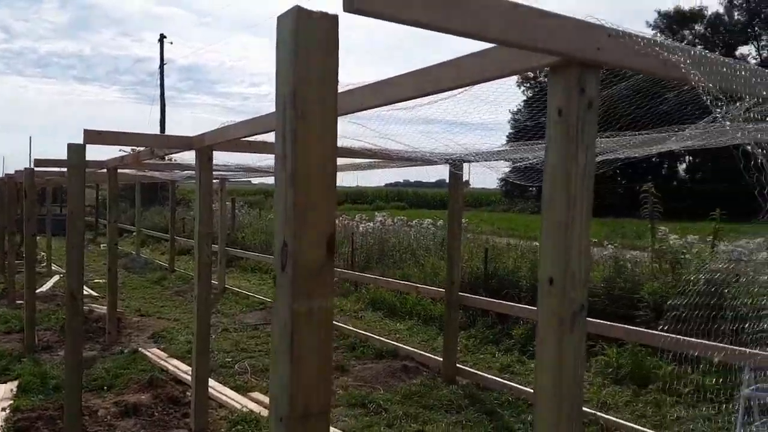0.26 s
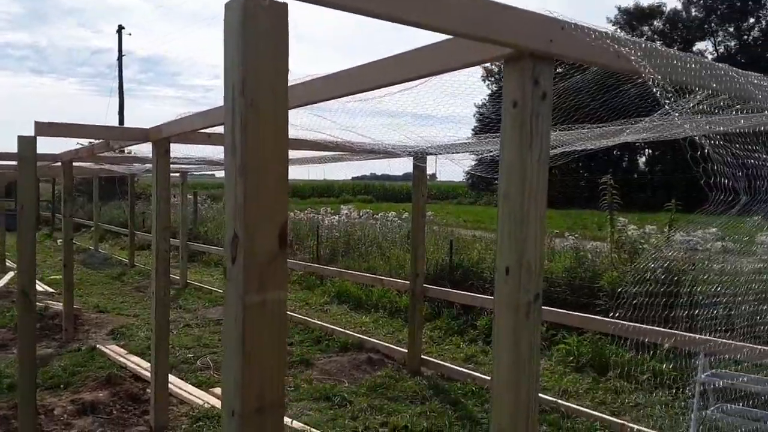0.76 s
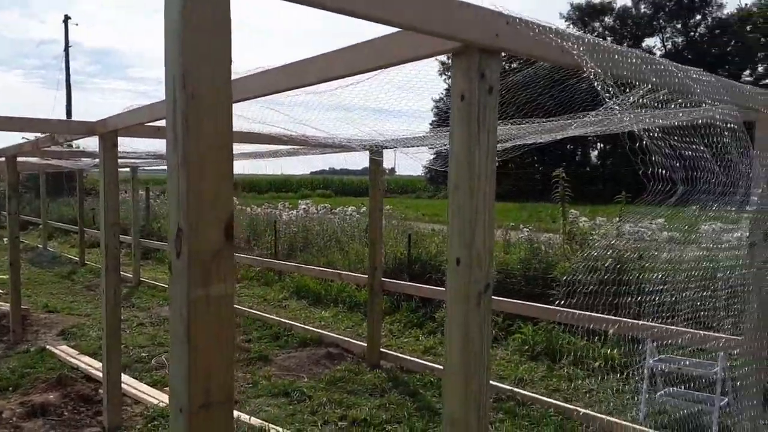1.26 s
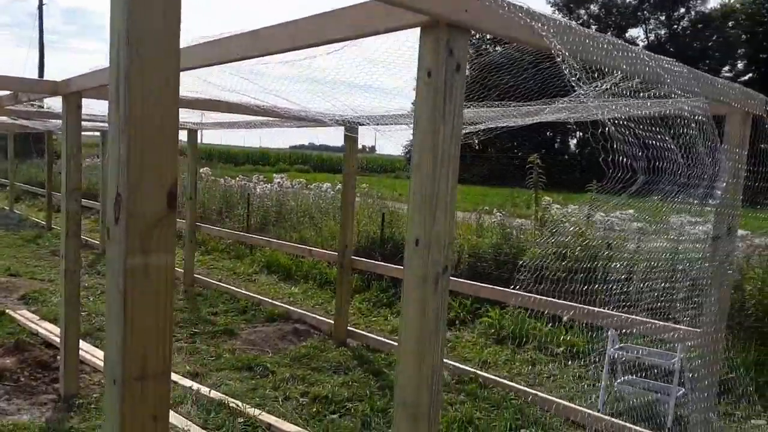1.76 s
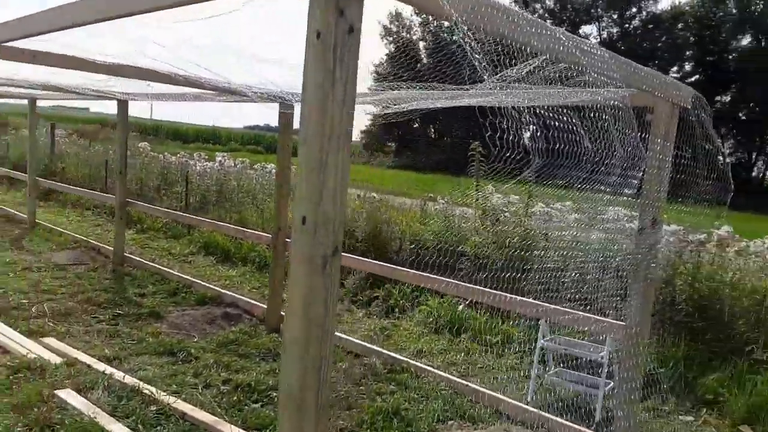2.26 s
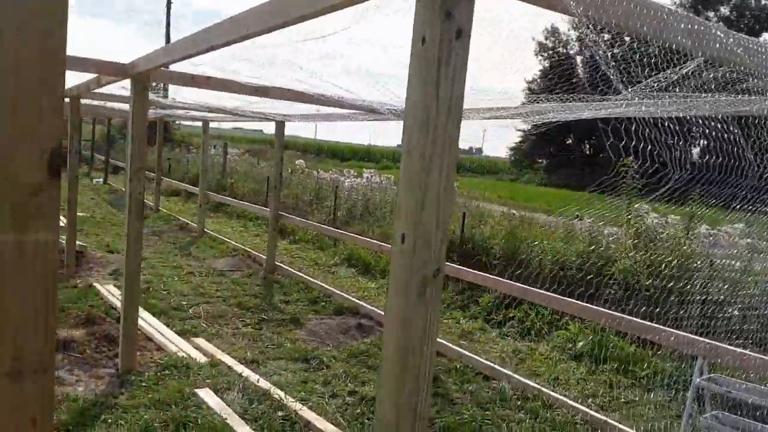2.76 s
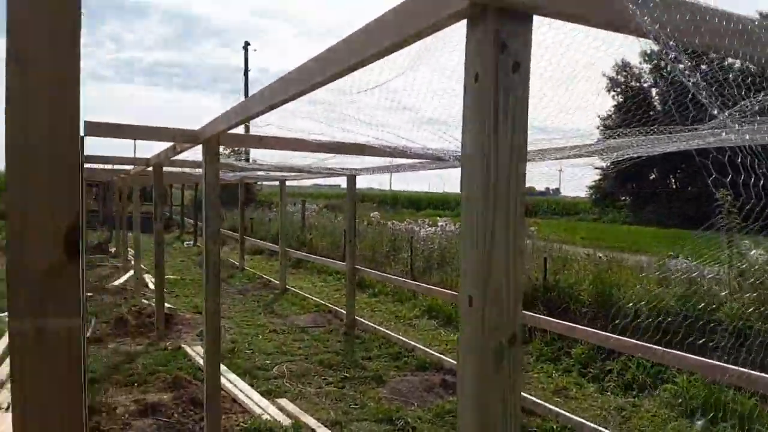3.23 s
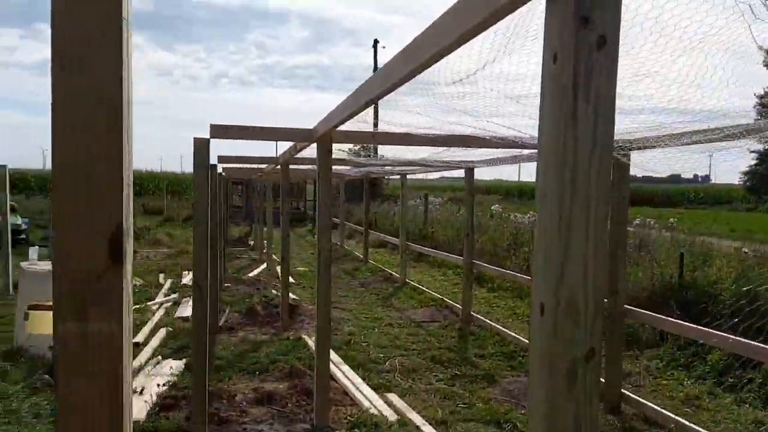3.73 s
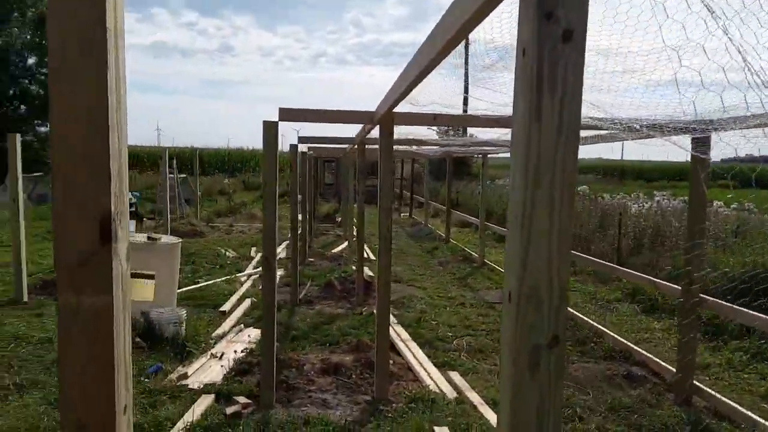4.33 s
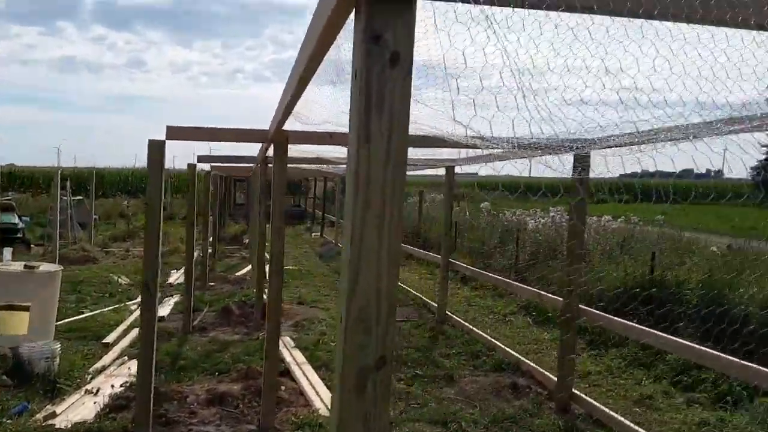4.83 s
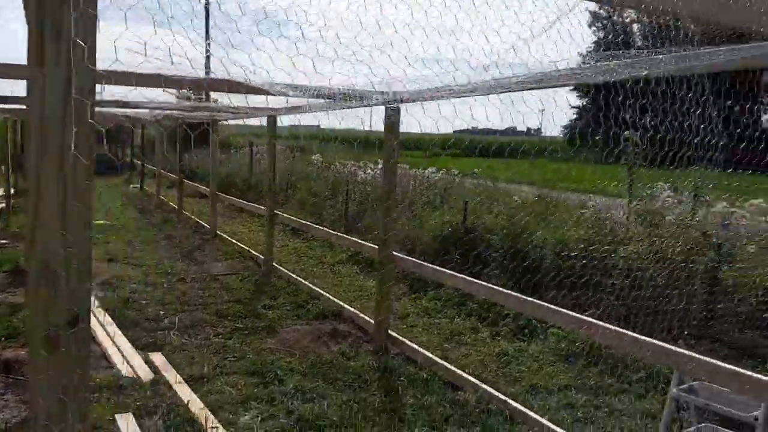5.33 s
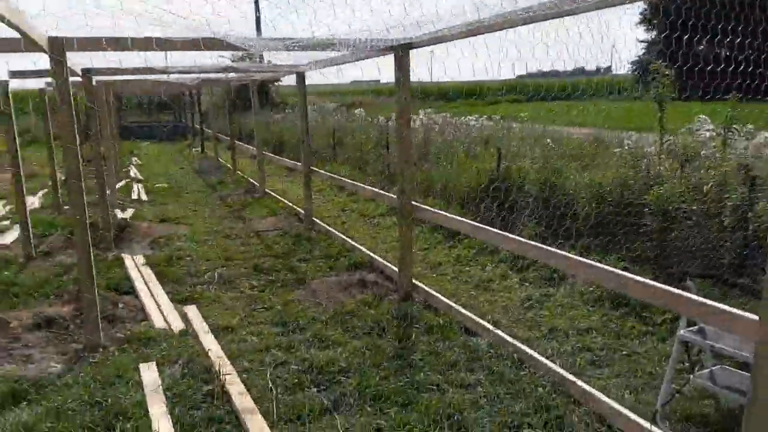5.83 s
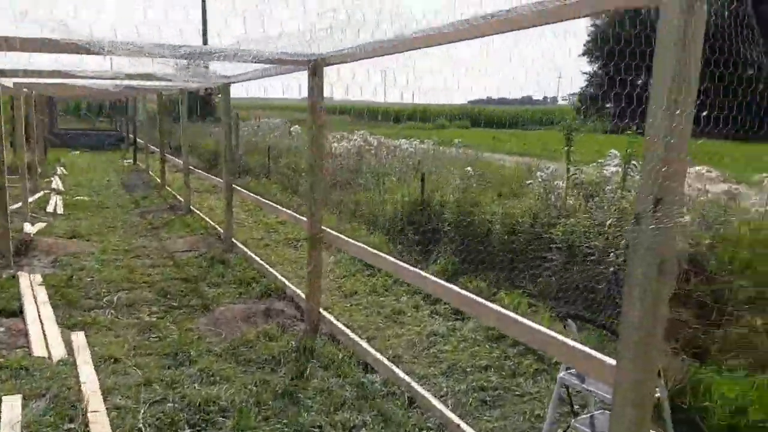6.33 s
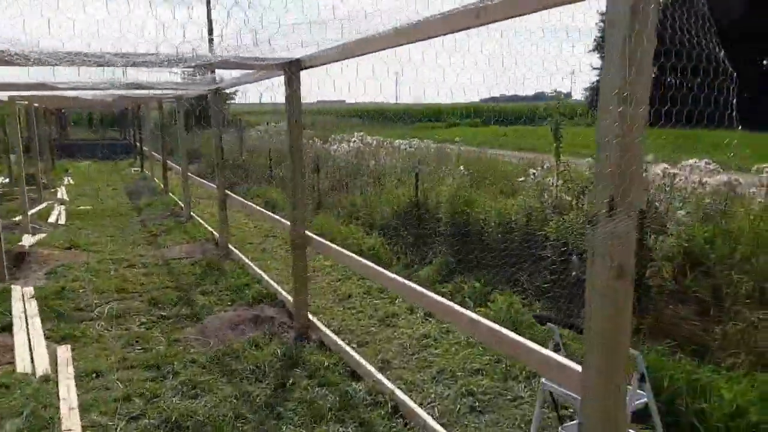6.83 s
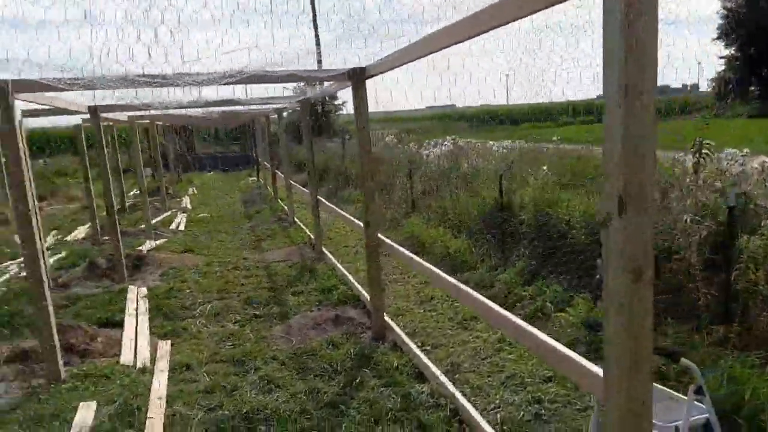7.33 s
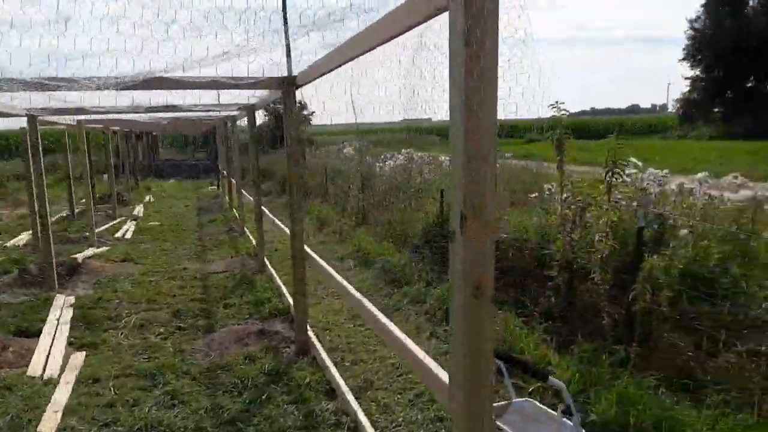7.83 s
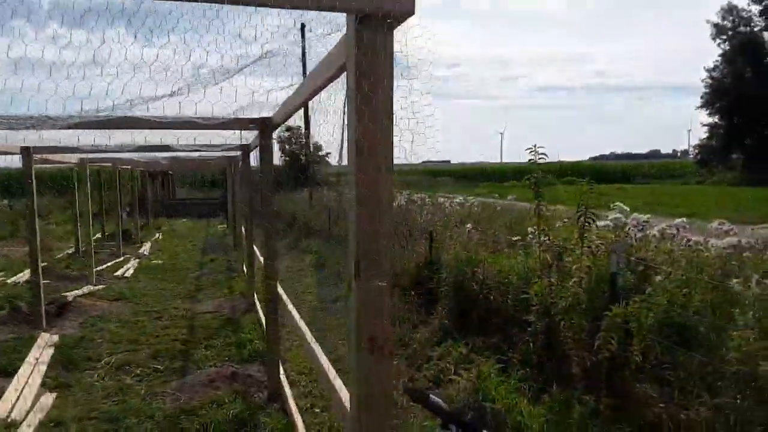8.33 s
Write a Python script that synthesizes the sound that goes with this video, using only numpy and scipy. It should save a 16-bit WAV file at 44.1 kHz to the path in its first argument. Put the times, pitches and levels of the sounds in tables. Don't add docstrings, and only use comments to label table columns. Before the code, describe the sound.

A quiet, open farm field heard in stereo from a carried microphone. From the start, high crickets pulse about sixteen times a second on the left, swelling and fading over a distant hissing insect drone, faint air and low wind rumble. A sparrow on the right gives quick, mostly falling chips from 0.7 to 1.8 seconds, then scattered ones until 4.6. Grass swishes softly around 2 to 3 seconds, with a few dry snaps near 2.6 and 2.9. At about 4.7 a rooster off to the left crows once: two short hoarse notes, a rasping climb and loud, rough peak to 5.5, then a clearer held note that roughens and fades by 6.8, lightly echoed. Cloth brushes blades during it. Dull grip knocks come around 6.3 to 7.0, with chirps near 6.6. A lower cricket enters around 7.3. From 7.75 to the end, close footsteps crackle and sharply snap dry stalks.

```python
import sys
import numpy as np
from scipy import signal
from scipy.fft import rfft, irfft, next_fast_len
from scipy.io import wavfile
from scipy.ndimage import uniform_filter1d

SR = 44100
rng = np.random.default_rng(int(sys.argv[2]) if len(sys.argv) > 2 else 0)


def linear_from_db(decibels):
    return 10 ** (np.asarray(decibels, float) / 20)


def unload_audio(sound):
    columns = np.transpose(np.atleast_2d(sound))
    steps = np.round(np.clip(columns, -1, 1) * 32767)
    wavfile.write(sys.argv[1], SR, steps.astype(np.int16))


N = 378816
T = np.arange(N) / SR

# [(t/s, f/Hz, effort/dB)]
LOW_FIRST = (17, [(4.666, 651, -73.5), (4.685, 658.5, -64.5), (4.7, 614, -66), (4.73, 627, -62.5),
             (4.755, 633, -71), (4.775, 640, -65), (4.8, 604, -65), (4.815, 600, -65)])
LOW_SECOND = (10, [(4.923, 634, -56), (4.935, 638, -65), (4.95, 640, -76.5), (4.985, 621, -69),
              (4.995, 635.6, -69), (5.012, 665.5, -64), (5.03, 642.5, -64), (5.045, 626.4, -72.5)])
LOW_CLIMB = (31.5, [(5.085, 589.6, -62), (5.11, 597, -62.5), (5.15, 621, -70.5), (5.17, 640.4, -65.5),
             (5.18, 625.4, -58), (5.198, 630.5, -69.5), (5.211, 641, -64.5), (5.225, 653, -76.5)])
LOW_PEAK = (34, [(5.226, 636, -69), (5.255, 635.3, -65.5), (5.288, 631, -64.5), (5.315, 630, -67.5),
            (5.332, 640, -71.5), (5.38, 655.4, -73.5), (5.43, 634, -72), (5.46, 617, -81),
            (5.52, 632.4, -75)])
LOW_FALL = (14.5, [(5.53, 686.5, -56), (5.57, 700, -51), (5.62, 704.7, -53.5), (5.7, 696.4, -50),
            (5.74, 677, -53.5), (5.78, 632, -61.5), (5.84, 589.6, -57), (5.89, 561, -62)])
LOW_TAIL = (-8, [(6.3, 706, -59), (6.5, 673, -53), (6.52, 717, -51.5), (6.58, 708, -53), (6.63, 663, -73),
            (6.665, 692, -49), (6.7, 695, -59), (6.77, 700, -66.5), (7.05, 718, -84)])
# [(t/s, f/Hz, effort/dB)]
HIGH_FIRST = (19.3, [(4.665, 629, -73), (4.69, 730, -65.5), (4.715, 795, -70), (4.737, 869, -66),
              (4.755, 750, -61), (4.79, 648, -71)])
HIGH_SECOND = (16.3, [(4.923, 829, -66.5), (4.941, 885, -72), (4.947, 911, -51.5), (4.965, 912, -59),
               (4.98, 881, -52.5), (5, 866, -62), (5.03, 899, -73), (5.06, 883, -68), (5.09, 880, -56)])
HIGH_RISE = (18.8, [(5.56, 853, -60), (5.585, 867, -58), (5.62, 878, -56), (5.66, 880, -57.5),
             (5.7, 919, -60.5), (5.74, 939.5, -67), (5.8, 966.6, -64), (5.9, 953, -62)])
HIGH_HELD = (13.1, [(5.901, 961, -52.5), (5.925, 883, -53), (5.96, 884, -52), (6.02, 877, -56.5),
             (6.1, 860, -55), (6.2, 859, -62)])
HIGH_TAIL = (19.1, [(6.201, 847, -68), (6.3, 862, -74), (6.4, 861, -70), (6.47, 840, -72.5),
             (6.51, 863, -75), (6.57, 862, -87), (6.6, 858, -73), (6.63, 873, -82), (6.68, 830, -92)])
# from t/s, to t/s, roughness 0-1
LOW_CLEAR = [(4.66, 4.82, .42), (4.91, 4.95, .25), (4.98, 5.04, .35), (5.09, 5.16, .4), (5.16, 5.22, .22),
             (5.24, 5.33, .05), (5.535, 5.77, .04), (5.77, 5.9, .15), (6.42, 6.6, .15), (6.6, 6.7, .2),
             (6.7, 6.77, .4)]
HIGH_CLEAR = [(4.66, 4.8, .4), (4.92, 5.0, .07), (5.03, 5.1, .3), (5.575, 5.715, .02), (5.715, 5.915, .35),
              (5.915, 6.16, .025), (6.58, 6.63, .1)]
# harmonic number, level re third harmonic/dB
LOW_REST = [(2, -21), (4, -16), (5, -34), (6, -28), (7, -29), (8, -36)]
# harmonic number, level re second harmonic/dB
HIGH_REST = [(3, -21), (4, -27), (5, -36)]
# t/s, gain/dB
LOW_BEAK = [(4.7, 15.5), (4.93, 6), (5, 16), (5.1, -7), (5.17, 2.5), (5.5, 5), (5.7, -5), (5.8, 12),
            (6.3, -15)]
HIGH_BEAK = [(4.8, 7), (4.925, 22.5), (4.94, 21), (4.947, 16), (5.02, 14), (5.1, -4), (5.6, -10), (6.2, -6),
             (6.4, -16)]
# t/s, length/s, start level/dB, end level/dB
PERIOD_DOUBLING = [
    (5.95, 0.21, -14.5, -5),
    (6.17, 0.413, -9.5, -2.5),
]
# t/s, length/s, start level/dB, end level/dB
RASP = [(4.62, 0.039, -72, -69.5), (4.83, 0.065, -69, -76), (4.68, 0.13, -65, -59.5),
        (4.94, 0.13, -61.5, -63), (5.09, .16, -63, -54.5), (5.3, 0.3, -62, -59.5), (5.58, 0.13, -64.5, -64),
        (5.72, 0.2, -56, -64.5), (5.93, 0.26, -68, -75), (6.18, 0.31, -65, -76.5), (6.55, 0.21, -85, -82)]
# f/Hz, width/Hz, level/dB
WINDPIPE = [(760, 240, 9), (1372, 160, 15.5), (1900, 460, 21), (2270, 35, 7), (2514, 76, 15.5),
            (3600, 400, 12.5), (4600, 1400, -35.5)]
# t/s, gain/dB
RASP_BEAK = [(5.4, 0), (5.5, -6), (5.7, -14), (6.1, -12), (6.4, -24)]
# t/s, left minus right level/dB
TURN = [(4.7, -7.5), (4.97, -6.5), (5.18, -6), (5.3, -3), (5.6, -6), (5.95, -6.5), (6.4, -4.5), (6.9, 4)]
# f/Hz, gain/dB
NEAR_PORT = [(100, -35), (800, 9), (2200, 11), (16000, 15.5)]
FAR_PORT = [(100, -45.5), (800, 4), (2200, -5), (16000, 18)]

# t/s, stroke count
STROKES_A = [(0, -.46), (3.6, 55.68), (8, 124.76), (8.405, 131), (8.6, 134.9)]
STROKES_B = [(0, -.06), (.35, 5.69), (1.25, 20.36), (2.45, 41.41), (5.75, 97.45), (6.35, 107.62),
             (8.6, 145.9)]
STROKES_C = [(0, -124.55), (7.7, 5.97), (8.26, 16), (8.6, 22.1)]
STROKES_D = [(0, -32.7), (1.868, 0), (8.6, 117.9)]
# share of stroke, f/Hz
SWEEP_C = [(-.2, 7450), (0, 7620), (.1, 7560), (.2, 7420)]
# wing strokes, loudness [(t/s, level/dB)], pitch [(share of stroke, f/Hz)], left minus right level/dB
CRICKETS = [
    (STROKES_A, [(0, -51.5), (.6, -55), (1.3, -51), (1.8, -55.5), (2.15, -50), (2.5, -53.5), (2.7, -58.5), (3.1, -49), (3.6, -61), (5.5, -63), (6.2, -62.5), (7.5, -58.5), (7.9, -69), (8.6, -49)], [(-.2, 8630), (.02, 8894), (.1, 8630), (.25, 8180)], 15.7),
    (STROKES_B, [(0, -55), (.8, -59), (1.1, -54), (1.4, -61), (2, -71), (2.5, -75), (3, -55), (3.2, -66), (3.5, -89), (6, -77), (6.4, -76), (7.7, -57), (8.6, -75)], [(-.2, 8150), (.2, 7850)], 14),
    (STROKES_C, [(6.9, -62), (7.35, -47), (7.7, -50), (7.8, -78), (8.25, -48), (8.6, -50.5)], SWEEP_C, 5.4),
    (STROKES_D, [(1.7, -83), (1.87, -61), (2.15, -52), (2.4, -57), (2.6, -83)], [(-.2, 8300), (0, 8400), (.1, 8330), (.2, 7850)], 8),
]

# t/s, length/s, start f/Hz, end f/Hz, level/dB
CHIPS = [(0.723, 0.077, 2910, 1990, -62.5), (1.13, 0.017, 2280, 2870, -62), (1.145, 0.085, 2700, 2610, -61),
         (1.2, 0.011, 2800, 2580, -58), (1.202, 0.014, 2420, 2310, -52), (1.21, 0.0095, 2400, 2310, -64),
         (1.233, 0.01, 2430, 2280, -50), (1.25, .02, 2350, 2310, -64), (1.166, 0.017, 3800, 3750, -58),
         (1.194, .022, 3800, 3700, -55), (1.214, 0.051, 3600, 2800, -57), (1.405, 0.02, 4650, 4400, -47),
         (1.337, 0.016, 4570, 4520, -52), (1.351, .018, 4500, 4460, -47), (1.36, 0.056, 4500, 2580, -60),
         (1.489, 0.045, 4150, 2450, -58), (1.612, 0.065, 3500, 2000, -58), (1.728, 0.062, 4500, 2150, -60),
         (2.642, 0.034, 3400, 2860, -58), (2.752, 0.04, 3850, 2630, -57), (3.19, 0.011, 4080, 3600, -53.5),
         (3.22, 0.012, 4080, 3600, -56), (3.232, .06, 3150, 2450, -62), (3.268, .016, 3200, 4150, -58),
         (3.576, .024, 4400, 2950, -59), (3.409, 0.016, 3600, 4240, -48.5), (3.465, 0.019, 4470, 3620, -45),
         (4.115, 0.045, 3750, 2800, -55), (4.272, 0.045, 4200, 2800, -56), (4.398, .04, 4250, 2830, -56),
         (4.515, 0.053, 4230, 2490, -59), (6.55, 0.03, 3460, 2920, -53), (6.555, 0.018, 4270, 4230, -47),
         (6.58, 0.028, 4550, 4470, -55), (6.599, .065, 4170, 4100, -57), (6.671, 0.042, 3750, 2630, -57),
         (6.71, .03, 4050, 3000, -56), (6.732, 0.048, 3180, 2730, -58), (7.572, 0.058, 3980, 2800, -58.5),
         (7.72, 0.047, 4030, 3020, -55)]

# t/s, length/s, start level/dB, end level/dB
CRUNCHES = [(1.95, 0.3, -96, -66), (2.88, 0.24, -62, -62), (7.75, 0.04, -68, -52.5),
            (7.82, 0.18, -53, -55.5), (8.04, 0.4, -76.5, -67.5), (8.31, 0.35, -74.5, -56.5)]
# t/s, length/s, start level/dB, end level/dB
SWISHES = [(1.85, 0.35, -73, -60), (2.19, 0.16, -55.5, -57.5), (2.38, 0.17, -70, -80),
           (2.58, 0.1, -75, -54.5), (6.22, 0.089, -74, -60), (2.87, 0.25, -66.5, -53),
           (4.65, 0.36, -70, -63), (4.95, 0.55, -60, -48), (5.4, 0.18, -71, -42.5), (5.64, 0.098, -61, -45),
           (5.9, 0.052, -59, -59), (7.72, 0.16, -67, -60), (7.97, 0.64, -60, -105),
           (8.29, 0.28, -62.5, -67)]
# t/s, length/s, start level/dB, end level/dB
BREEZE = [(1.45, .9, -78, -75), (2.35, .35, -81, -79), (2.85, 1.75, -73, -73), (4.6, 2.2, -75, -77),
          (6.8, .9, -76, -82)]
# t/s, length/s, start level/dB, end level/dB
SCUFFS = [(7.79, 0.027, -5, -3), (7.818, 0.035, 3, -4.5)]
# t/s, peak level/dB, f/Hz
SNAPS = [(2.567, -55, 2420), (2.604, -55, 2310), (3.45, -50, 2600), (7.855, -45.5, 2600),
         (7.891, -51, 2290), (7.927, -42, 1510), (7.938, -58, 1600), (7.951, -60, 1710), (7.977, -50, 2000),
         (8.218, -49, 2300), (8.418, -44, 2410), (8.452, -56, 1610), (8.493, -58, 1410), (8.519, -46, 3700),
         (2.893, -57, 2290), (2.909, -40.5, 2250), (2.959, -44, 2130), (2.967, -48, 2430),
         (7.779, -46, 2170), (7.795, -43.5, 2000), (8.236, -53, 1460), (8.307, -51, 2270),
         (8.397, -46, 2000), (8.436, -44, 1840), (8.509, -49, 1990), (8.516, -48, 1630), (8.546, -46, 2210),
         (7.854, -43.5, 1060), (7.877, -40, 2230), (7.903, -38, 2300), (7.917, -37, 1120),
         (7.958, -44, 1500), (8.094, -49, 2600), (8.101, -39.5, 3000), (8.102, -44, 7500),
         (8.206, -31, 2270), (8.279, -44.5, 1650), (8.32, -45, 1900), (8.336, -32.5, 2080),
         (8.366, -42, 2060), (8.376, -39.5, 1960), (8.382, -44, 1970), (8.41, -41.5, 2140),
         (8.467, -53, 1410), (8.501, -40.5, 3200), (8.565, -43.5, 2220)]
# t/s, peak level/dB, f/Hz
KNOCKS = [(3.451, -54, 220), (4.768, -47, 111), (6.329, -43, 488), (6.354, -41.5, 409.5),
          (6.831, -47.5, 117), (6.975, -35.5, 158), (7.901, -49.5, 198)]
# f/Hz, level per Hz/dB
CRUNCH_COLOUR = [(150, -45), (250, -19.5), (520, -10), (1110, -11.5), (2030, -4), (5000, -14.5),
                 (6500, -68), (11000, -120)]
SWISH_COLOUR = [(5470, -34), (9300, -8), (9490, -9), (10200, -7), (10900, -9), (12200, -3), (14800, -16.5),
                (15800, -31.5)]

# t/s, level/dB
DRONE = [(0, -64.5), (.45, -66), (1.05, -66), (1.3, -64), (2.2, -58.5), (5.9, -56.5), (7.4, -61),
         (8.6, -59)]
# f/Hz, level per Hz/dB
FAR_DRONE_COLOUR = [(3000, -36), (4000, -27), (4600, -18),
                    (5200, -19), (6400, -14.5), (7300, -16), (8300, -15), (8800, -15.5), (9300, -25.5),
                (10200, -31.5), (15900, -15)]
# t/s, level/dB
FENCE_CHORUS = [(1.6, -84), (2, -66), (3, -61), (5.5, -57), (6.5, -86)]
# t/s, level/dB
NEAR_CHORUS = [(0.45, -84), (1.1, -82), (1.2, -70), (2.7, -72), (4.6, -68), (5.5, -66), (5.7, -78),
               (6.2, -76), (6.75, -76), (6.85, -69), (7.25, -70), (7.35, -82), (7.7, -80), (7.8, -70)]
# t/s, level/dB
WIND = [(0.0, -62.5), (1.22, -73.5), (1.53, -71), (1.7, -66), (2.01, -67), (2.37, -68.5), (3.13, -72),
        (3.85, -61.5), (4.04, -58.5), (4.59, -68.5), (4.73, -66.5), (5.95, -63.5), (6.12, -62.5),
        (6.99, -63.5), (7.23, -65.5), (7.56, -63.5), (8.01, -72.5), (8.59, -65)]
# f/Hz, level per Hz/dB
WIND_COLOUR = [(14, -49), (30, -13.5), (102, 3), (134, -3), (217, -12.5), (500, -19), (800, -24.5),
               (1500, -27)]
# f/Hz, gain/dB
LEFT_PORT_WIND = [(10, 8.5), (40, 4), (100, -1), (200, 3), (1200, 4.5)]
# f/Hz, level per Hz/dB
FIELD = [(200, -10), (400, 0), (1250, -6), (2000, -1), (3200, -6), (9500, -4), (15800, -7), (16500, -40)]


def rooster():
    low_notes = [LOW_FIRST, LOW_SECOND, LOW_CLIMB, LOW_PEAK, LOW_FALL, LOW_TAIL]
    high_notes = [HIGH_FIRST, HIGH_SECOND, HIGH_RISE, HIGH_HELD, HIGH_TAIL]
    low = membrane(low_notes, LOW_CLEAR, low_partials, smear_hz=180)
    high = membrane(high_notes, HIGH_CLEAR, high_partials, smear_hz=190)
    voice = low + high + rasp()
    swing = linear_from_db(track(TURN)[0] * np.array([[1], [-1]]) / 2)
    left, right = np.array([colour(voice, NEAR_PORT), colour(voice, FAR_PORT)]) * swing
    port_lag = 16
    direct = np.array([left, np.roll(right, port_lag)])
    return direct + linear_from_db(-12.5) * farm_echo(voice)


def membrane(notes, clear, partials, smear_hz, fade_s=0.0023):
    rows = sorted((*row, lift) for lift, note in notes for row in note)
    hz, first_db, lift_db = track(rows)
    spans = [(note[0][0], note[-1][0] - note[0][0], 0, 0) for lift, note in notes]
    sounding = bouts(spans, fade_s, fade_s).clip(0, 1)
    rough = np.full(N, 0.63)
    for start, end, share in clear:
        rough[(T >= start) & (T < end)] = share
    rough = uniform_filter1d(rough, SR // 40).clip(0, 1)
    phase = 2 * np.pi * np.cumsum(hz) / SR
    out = 0
    for k, db in partials(hz, first_db, first_db + lift_db):
        uneven = (walk(smear_hz) + 1j * walk(smear_hz)) / np.sqrt(2)
        blur = 1 - (1 - rough) ** max(k / 3, 1)
        shape = np.sqrt(1 - blur) + 1.1 * np.sqrt(blur) * uneven
        out = out + np.sqrt(2) * linear_from_db(db) * np.real(shape * np.exp(1j * k * phase))
    return sounding * out


def low_partials(hz, first_db, third_db):
    beak_hz, beak_width_hz = 1900, 70
    third_db = third_db - 10 * np.log10(1 + ((3 * hz - beak_hz) / beak_width_hz) ** 2)
    partials = [(1, first_db), (3, third_db)]
    for k, db in LOW_REST:
        opened_db = third_db + db + (k > 3) * track(LOW_BEAK)[0]
        partials.append((k, np.maximum(opened_db, first_db - 7.5 * k)))
    return partials


def high_partials(hz, first_db, second_db):
    half_db = second_db + 20 * np.log10(bouts(PERIOD_DOUBLING, 0.03, 0.06) + 0.001)
    partials = [(1, first_db), (2, second_db), (3 / 2, half_db), (5 / 2, half_db - 8)]
    beak_db = track(HIGH_BEAK)[0]
    return partials + [(k, second_db + db + beak_db) for k, db in HIGH_REST]


def rasp():
    air = rng.standard_normal(N) * linear_from_db(3 * walk(70))
    beak_db = track(RASP_BEAK)[0]
    out = 0
    for hz, width_hz, db in WINDPIPE:
        out = out + level(band(air, hz, width_hz), db) * linear_from_db((hz > 2400) * beak_db)
    return out * linear_from_db(-6) * bouts(RASP, attack_s=0.045, release_s=0.05)


def farm_echo(voice):
    t = T[:SR // 2]
    tail = rng.standard_normal((2, len(t))) * linear_from_db(-60 * t / 0.7) * (t > 0.012)
    tail = tail / np.sqrt(np.sum(tail[0] ** 2))
    return signal.fftconvolve(voice[None], tail, axes=1)[:, :N]


def crickets():
    out = 0
    for strokes, loud, sweep, pan_db in CRICKETS:
        share = (track(strokes)[0] + 0.5) % 1 - 0.5
        at, hz = np.transpose(sweep)
        pitch = np.interp(share, at, hz) * (1 + 0.0047 * walk(60.43))
        stroke = np.clip(1 - (share / 0.23) ** 2, 0, 1) ** 1.5
        stroke = stroke * linear_from_db(1.5 * walk(350))
        loudness = linear_from_db(track(loud)[0] + 1.3 * walk(4.6))
        whistle = stroke * loudness * np.sin(2 * np.pi * np.cumsum(pitch) / SR)
        out = out + place(whistle, pan_db, -10)
    return out


def sparrow():
    out = np.zeros(N)
    for s, length, from_hz, to_hz, db in CHIPS:
        u = np.arange(int(length * SR)) / (length * SR)
        hz = from_hz + (to_hz - from_hz) * np.sin(np.pi / 2 * u) ** 1.15
        swell = linear_from_db(db - 5.1 * u) * np.sin(np.pi * u) ** 0.64
        i = int(s * SR)
        out[i:i + len(u)] += swell * np.sin(2 * np.pi * np.cumsum(hz) / SR)
    direct = place(out * linear_from_db(3.5 * walk(150) - 3), -3, -14)
    leaves = rng.standard_normal((2, SR // 8)) * linear_from_db(-60 * T[:SR // 8] / 0.13)
    return direct + linear_from_db(-32) * signal.fftconvolve(out[None], leaves, axes=1)[:, :N]


def feet():
    strength = rng.exponential(size=N // 40 + 1).clip(0, 5)
    grains = noise_pair(0.6) * linear_from_db(2.2 * np.repeat(strength, 40)[:N])
    crunch = level(colour(grains, CRUNCH_COLOUR), 4) * linear_from_db([[4], [-4]])
    crunch = crunch * (linear_from_db(-91) + bouts(CRUNCHES, attack_s=0.036, release_s=0.12))
    blades = level(band(grains, 2050, 1200), 9) * bouts(BREEZE, attack_s=0.12, release_s=0.16)
    swish = colour(noise_pair(0.2) * linear_from_db(0.88 * walk(40)), SWISH_COLOUR)
    swish = level(swish, 0) * linear_from_db([[4], [-9]])
    swish = swish * (linear_from_db(-86) + bouts(SWISHES, attack_s=0.04, release_s=0.06))
    scuff = level(band(grains, 5600, 6200), -46) * bouts(SCUFFS, attack_s=0.0034, release_s=0.017)
    snaps = ring(SNAPS, cycles=0.67, pan_db=21.5)
    knocks = ring(KNOCKS, cycles=0.35, pan_db=14)
    return crunch + blades + swish + scuff + snaps + knocks


def ring(events, cycles, pan_db):
    out = np.zeros((2, N + SR))
    pan = np.array([[pan_db], [-pan_db]]) / 2
    for s, db, hz in events:
        turn = np.arange(int(8 * cycles * SR / hz)) * hz / SR
        i = int(s * SR)
        shape = np.e * turn / cycles * np.exp(-turn / cycles) * np.sin(2 * np.pi * turn)
        out[:, i:i + len(turn)] += linear_from_db(db + pan) * shape
    return out[:, :N]


def insect_drone():
    drone = 0
    for hz in 3400 * 2 ** np.arange(0, 1.7, 0.15):
        patch = linear_from_db(1.5 * walk(1.5) + 1.6 * walk(16))
        drone = drone + level(band(noise_pair(0), hz, hz / 6), 0) * patch * np.sqrt(hz)
    drone = level(colour(drone, FAR_DRONE_COLOUR), 6)
    drone = drone * linear_from_db(track(DRONE)[0]) * linear_from_db([[2], [-2]])
    fence_gain = linear_from_db(track(FENCE_CHORUS)[0] + 2 * walk(23))
    near_gain = linear_from_db(track(NEAR_CHORUS)[0] + 1.5 * walk(12))
    fence = level(band(noise_pair(0.2), 7350, 320), 0) * fence_gain
    near = level(band(noise_pair(0.2), 3900, 1100), 0) * near_gain
    return drone + fence + near


def wind():
    gusts = np.array([track(WIND)[0] + 2 + 4 * walk(7.7) for port in range(2)])
    left, right = colour(noise_pair(0.3), WIND_COLOUR)
    rumble = np.array([colour(left, LEFT_PORT_WIND), right])
    return level(rumble, 0) * linear_from_db(gusts)


def field_air():
    air = colour(noise_pair(0.08), FIELD)
    middle = colour(air, [(600, 0), (3000, 0)])
    return air * linear_from_db(-79.5) / np.sqrt(np.mean(middle ** 2)) * linear_from_db([[1.5], [-1.5]])


def level(x, db):
    return x * linear_from_db(db) / np.sqrt(np.mean(x ** 2))


def track(rows):
    s, *columns = np.transpose(rows)
    return [np.interp(T, s, c) for c in columns]


def bouts(rows, attack_s, release_s):
    gain = 0
    for s, length, from_db, to_db in rows:
        drift = linear_from_db(np.interp(T, [s, s + length], [from_db, to_db]))
        rise = (T - s) / attack_s + 0.5
        fall = (s + length - T) / release_s + 0.5
        gain = gain + drift * np.clip(np.minimum(rise, fall), 0, 1)
    return gain


def walk(rate):
    k = int(SR / rate)
    return level(uniform_filter1d(uniform_filter1d(rng.standard_normal(N), k), k), 0)


def colour(x, spectrum):
    hz, db = np.transpose(spectrum)
    size = next_fast_len(N)
    f = np.log(np.fft.rfftfreq(size, 1 / SR) + 1)
    gain = linear_from_db(np.interp(f, np.log(hz), db, -90, -90))
    return irfft(rfft(x, size) * gain, size)[..., :N]


def band(x, hz, width_hz):
    b, a = signal.iirpeak(hz, hz / width_hz, fs=SR)
    return signal.lfilter(b, a, signal.lfilter(b, a, x))


def place(x, pan_db, lag):
    left = np.roll(x, max(-lag, 0)) * linear_from_db(pan_db / 2)
    right = np.roll(x, max(lag, 0)) * linear_from_db(-pan_db / 2)
    return np.array([left, right])


def noise_pair(likeness):
    mid, side = rng.standard_normal((2, N))
    shared, apart = np.sqrt(1 + likeness) * mid, np.sqrt(1 - likeness) * side
    return np.array([shared + apart, shared - apart])


def scene():
    return rooster() + crickets() + sparrow() + feet() + insect_drone() + wind() + field_air()


def band_limit(x):
    return signal.sosfilt(signal.butter(12, 15910, fs=SR, output="sos"), x)


def record(dry):
    return band_limit(dry)


dry = scene()
out = record(dry)
unload_audio(out)
```